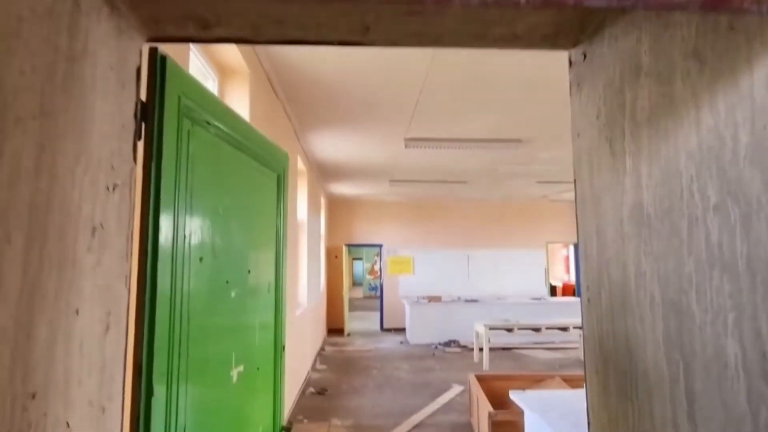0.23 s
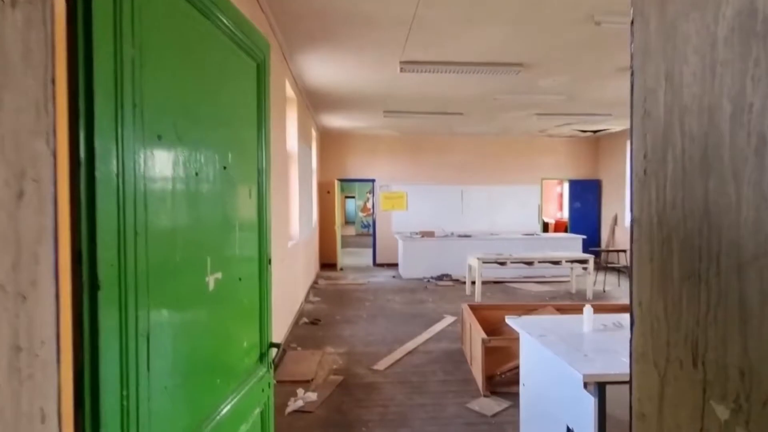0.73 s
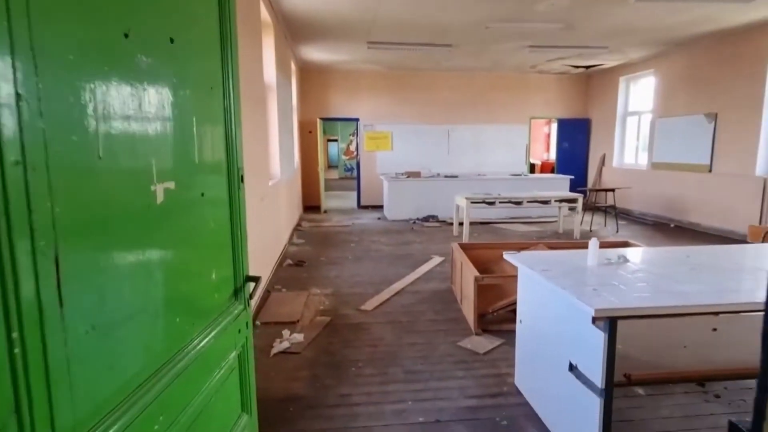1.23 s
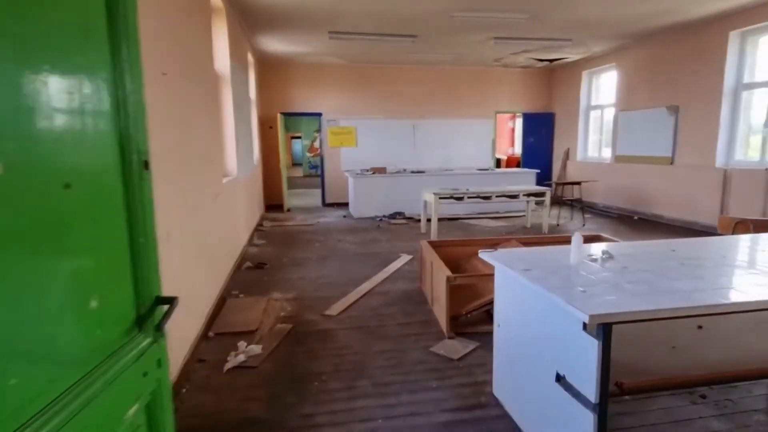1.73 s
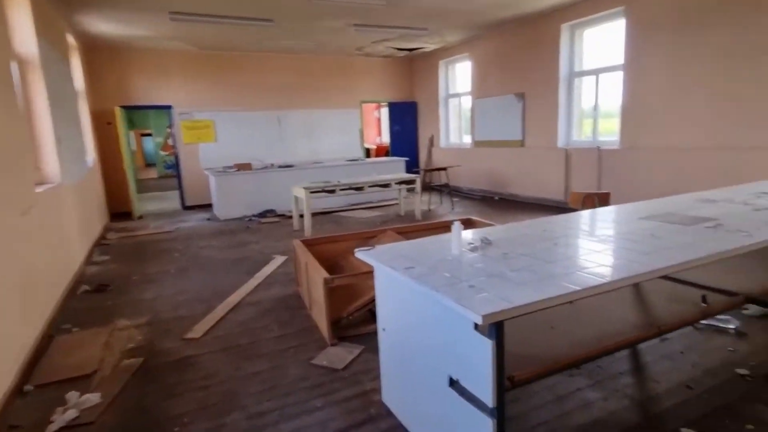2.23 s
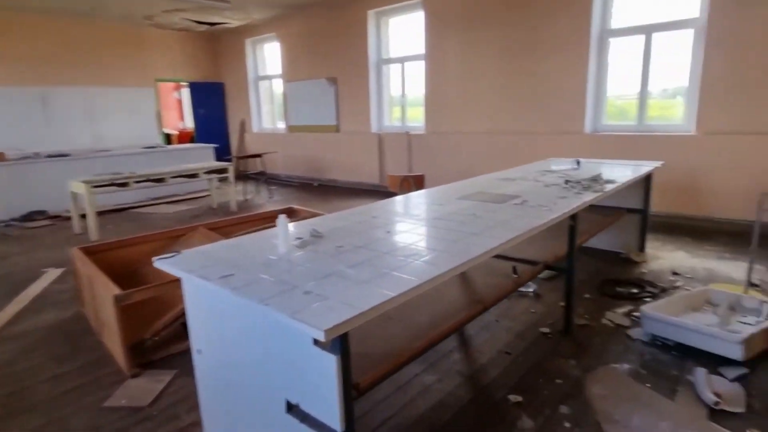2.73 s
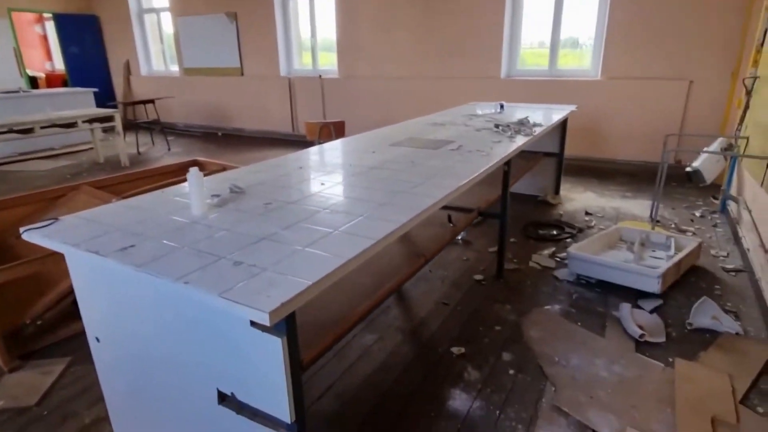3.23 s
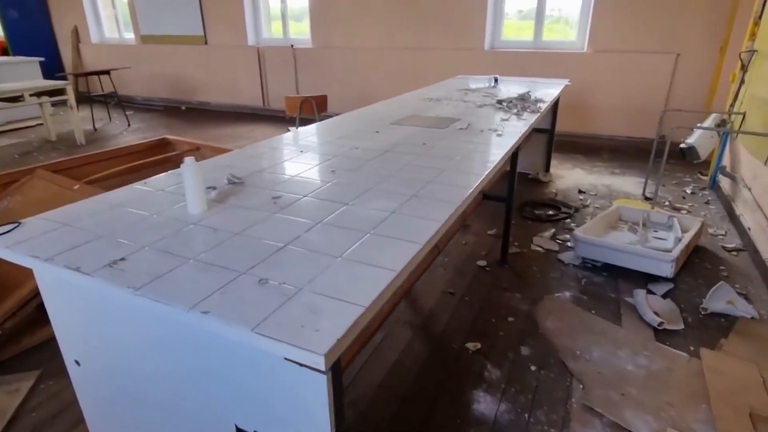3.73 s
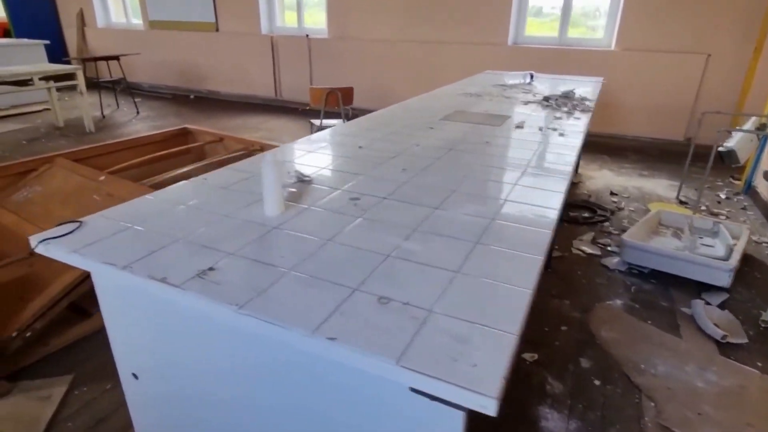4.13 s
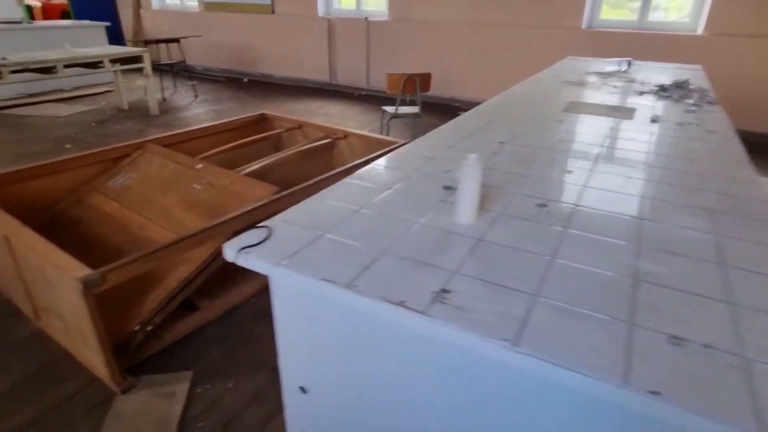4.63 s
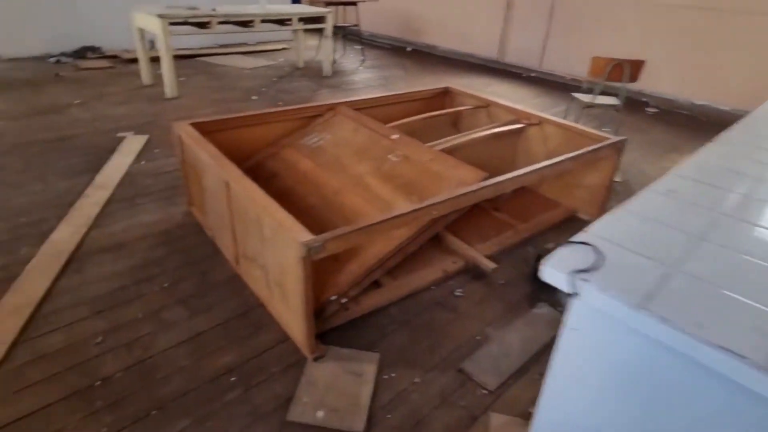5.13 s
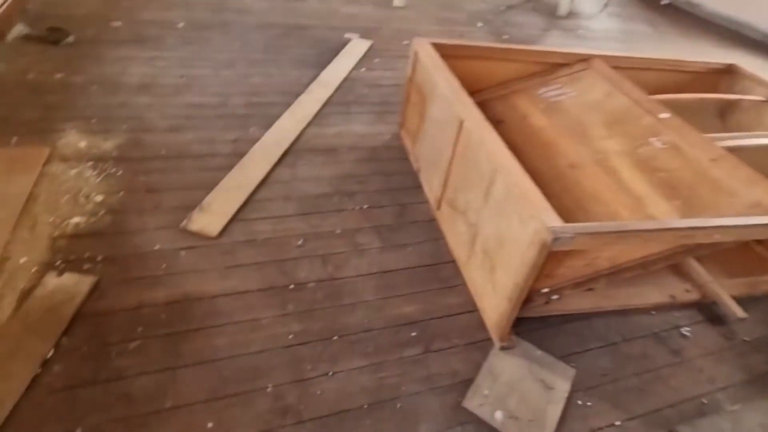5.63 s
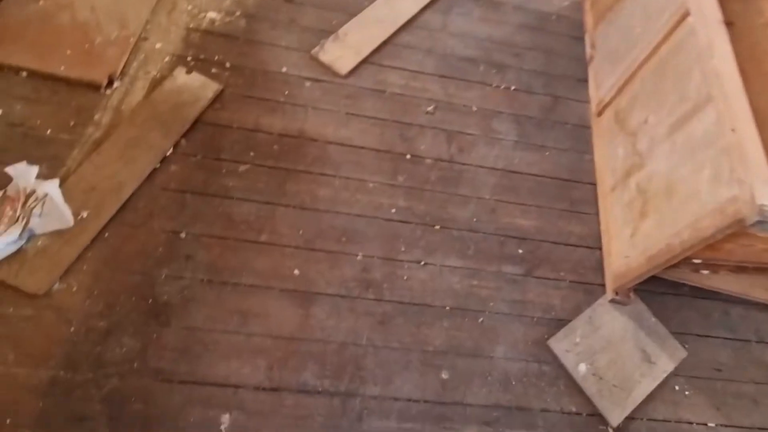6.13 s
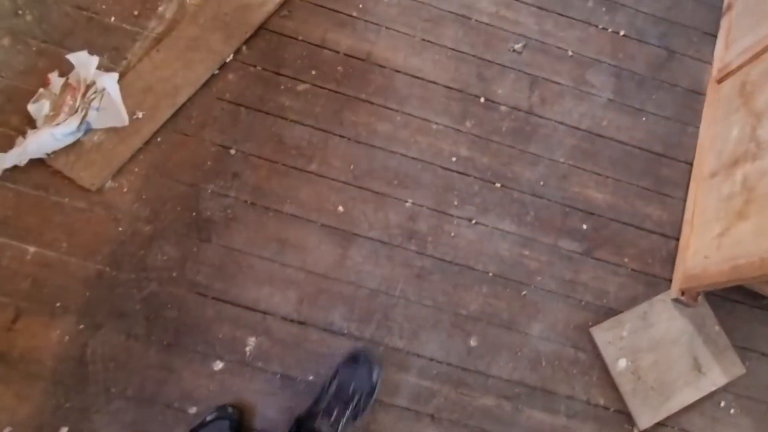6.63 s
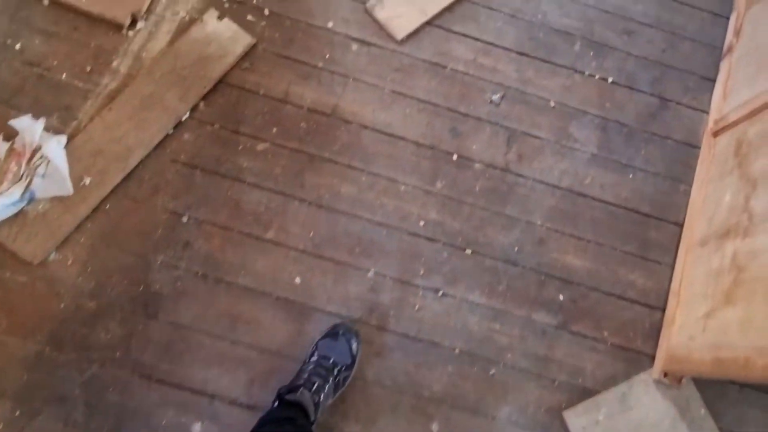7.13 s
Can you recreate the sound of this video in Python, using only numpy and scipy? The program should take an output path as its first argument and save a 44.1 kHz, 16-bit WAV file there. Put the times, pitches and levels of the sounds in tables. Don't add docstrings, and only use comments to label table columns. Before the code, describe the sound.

Someone walks over hollow wooden planks in a large empty room, with sharp heel knocks, gritty ticks and about a second of reverberation.

```python
import sys
import numpy as np
from scipy import signal
from scipy.fft import rfft, irfft, next_fast_len
from scipy.io import wavfile
from scipy.ndimage import uniform_filter1d, map_coordinates

SR = 44100
rng = np.random.default_rng(int(sys.argv[2]) if len(sys.argv) > 2 else 0)


def attenuation_scalar(level_db):
    decades = np.asarray(level_db, float) / 20
    return 10 ** decades


def bounce(signal):
    frames = np.transpose(np.atleast_2d(signal))
    limited = np.clip(frames, -1, 1)
    pcm = np.round(limited * 32767).astype(np.int16)
    wavfile.write(sys.argv[1], SR, pcm)


N = 326340

# frequency in Hz, level in dB per Hz.
HISS_SPECTRUM = [(800, -36), (2000, -1), (5000, 0), (8000, 2.5), (12000, -.5), (16000, -2)]
# frequency in Hz, level in dB per Hz.
AIR_SPECTRUM = [(35, -34), (60, 2.5), (120, 1), (250, -0.5), (400, -2.5), (770, -5.5), (1100, -13.5),
                (2300, -22.5), (4000, -28.5), (7200, -32), (10000, -29), (12000, -41.5), (16000, -72)]
# start in seconds, hold in seconds, level in dB.
SHIFTS = [
    (1.05, 0.13, -66),
    (1.85, 0.034, -61),
    (2.8, 0.027, -52.5),
    (3.3, 0.22, -57),
    (3.8, 0.077, -61),
    (5.2, .03, -63),
    (5.55, 0.02, -54),
    (6.3, 0.17, -62),
    (7.2, 0.074, -72),
]
# frequency in Hz, level in dB per Hz.
JOIST_SPECTRUM = [(15, -19), (30, -10), (50, 0.5), (65, 3.5), (110, -6), (200, -36.5)]
# start in seconds, hold in seconds, level in dB.
DRAGS = [
    (0.0, 0.17, -48.5),
    (1.0, 0.34, -50.5),
    (1.45, 0.36, -57.5),
    (1.95, 0.1, -53),
    (2.55, 0.1, -46),
    (6.26, .01, -44),
    (6.42, 0.41, -59),
]
# frequency in Hz, level in dB per Hz.
DRAG_SPECTRUM = [(88, -50), (150, 1.5), (245, -0.5), (361, -9), (475, 2.5), (800, -11.5), (1360, -13),
                 (2200, -36.5), (6600, -120)]
# start in seconds, peak in dB, t60 in seconds, treble loss in dB per octave.
SOFT_STEPS = [(.019, -47.5, 0.18, 9), (.378, -42.5, 0.39, 10.5), (.875, -40.5, 0.31, 11.5),
              (1.05, -47, 0.24, 11.5), (1.199, -42, 0.25, 8.5), (1.328, -40.5, 0.099, 20),
              (1.421, -62, .057, 17), (1.768, -43.5, 0.16, 10), (1.854, -42, 0.27, 31),
              (1.922, -39, 0.065, 14), (2.054, -40.5, 0.045, 9.5), (2.504, -44, 0.16, 16.5),
              (2.556, -42, 0.46, 32), (6.337, -55, 0.056, 8), (6.388, -45, 0.039, 14),
              (6.79, -45.5, .15, 38)]
# start in seconds, peak in dB, room send
# in dB, treble loss in dB per octave.
GRIT = [(0.899, -44.5, 1, 23), (0.9454, -42, 3, 37), (1.1897, -42.5, 0, 32), (1.2962, -50.5, 10, 25),
        (1.77, -46.5, -2, 11), (1.921, -50, -6, 29), (1.9707, -45.5, 9, 37), (2.801, -44.5, 2.5, 24),
        (2.8692, -33.5, 0, 26), (3.1074, -53, -22, 55), (3.232, -37, -11.5, 28), (3.3211, -52, -21, 38),
        (3.6207, -40, -28, 52), (3.647, -40, -7, 66), (3.8372, -49, 2, 21), (4.087, -48.5, 5.5, 39),
        (4.524, -18.5, -33, 21.5), (4.8387, -39, -13, 31), (5.4976, -60, -11, 21),
        (5.5225, -31.5, -8.5, 27), (5.8714, -65, -16, 7), (6.1845, -55, -4, 9), (6.307, -44, -2.5, 34)]
# start in seconds, peak in dB, t60 in seconds, room send in dB,
# treble loss in dB per octave.
CRACKS = [(2.733, -30, 0.043, 9.5, 43), (2.748, -25.5, 0.045, -3.5, 19.5), (2.871, -23.5, 0.077, 1.5, 24.5),
          (3.069, -29.5, 0.034, -3, 17), (3.1, -31, .05, -2, 37), (3.372, -27.5, 0.04, 6, 57),
          (3.7, -5.5, 0.015, -2.5, 26), (3.837, -20.5, 0.037, -1, 22), (4.444, -34.5, .036, 3.5, 18),
          (4.524, -4, 0.011, 0.5, 19), (5.178, -7, 0.024, -2.5, 31.5), (6.16, -45, 0.016, 10.5, 68),
          (6.236, -24.5, 0.023, -2, 58.5), (6.247, -33.5, 0.037, -12, 22), (6.559, -36, 0.016, -3, 35),
          (7.22, -33.5, 0.076, -4, 66)]
# start in seconds, peak in dB, pitch in Hz, rise in seconds,
# room send in dB.
SWELLS = [(.39, -62.5, 2220, .003, 22.5), (0.398, -55, 3270, .002, 13.5), (1.35, -55, 1390, 0.057, 3.5),
          (1.4, -49, 705, 0.0091, -2), (1.48, -60, 767, 0.12, 0), (2.729, -11, 107, 0.032, -5.5),
          (2.733, -21.5, 241, 0.024, 2), (2.742, -28.5, 533, 0.007, 4), (2.777, -23.5, 108, 0.055, -18),
          (2.849, -26, 110, 0.034, 1), (2.951, -34, 99, 0.052, -9), (3.1, -35, 1064, 0.0046, -13),
          (4.448, -23, 158.4, 0.04, 0), (6.76, -63, 1330, 0.086, 4), (6.8, -47, 475, 0.027, 3)]
# start in seconds, peak in dB, pitch in Hz, room send in dB.
THUMPS = [(2.06, -41, 250, -25), (3.072, -32.5, 580, 1), (3.14, -35, 207, 7), (3.72, -34.5, 147.6, 4),
          (3.84, -26, 133.3, -3.5), (3.85, -22.5, 183.8, 1.5), (4.402, -34.5, 167, 9),
          (4.5245, -5.5, 683, -6.5), (4.526, -17, 2500, -23), (4.53, -18, 534, 4), (4.534, -16, 213, -4),
          (4.536, -30, 870, -27), (5.174, -14.5, 256.3, -1), (5.176, -25, 1070, -13), (5.18, -22.5, 684, 5),
          (5.201, -29.5, 152, -4.5), (5.575, -26, 266, -36)]
# start in seconds, peak in dB, pitch in Hz, room send in dB.
TAPS = [(1.139, -40, 152, -19), (2.297, -44, 273, -6), (3.415, -25, 231, -10), (3.45, -28, 195, 4),
        (5.581, -31, 66, -12), (6.156, -39, 493, -11), (6.183, -37.5, 154, 8.5), (6.236, -29, 824, -30),
        (6.368, -32.5, 184, 1), (6.39, -45, 346, -8), (6.556, -38.5, 510, -18), (6.736, -49, 180, 9),
        (7.2, -39.5, 185, -2), (7.285, -45, 234, -9), (.89, -48.5, 310, 12), (1.05, -39, 174, -2),
        (1.32, -39, 250, 4.5), (1.848, -44.5, 223, -16)]
# start in seconds, peak in dB, pitch in Hz, t60 in seconds, room send in dB.
KNOCKS = [(3.071, -20.5, 353, 0.05, -2), (3.071, -34.5, 926, 0.12, 1), (3.701, -6.5, 348, 0.038, -14),
          (3.709, -11.5, 351, 0.36, -8.5), (3.7, -26, 755, 0.071, 5.5), (3.839, -13, 285, 0.12, -2.5),
          (4.443, -27, 322.5, 0.072, -6), (4.526, -2.5, 323, 0.02, -7.5), (5.175, -14, 497, 0.019, -8),
          (5.47, -29.5, 222, 0.067, 6.5), (7.215, -49, 390, 0.087, 13), (3.371, -23.5, 223, 0.075, -3),
          (3.373, -38, 620, 0.046, -3), (6.234, -23, 267, 0.05, -8), (6.247, -42.5, 2350, 0.02, -6)]
# delay in seconds, level in dB.
EARLY_ECHOES = [(.013, -7), (.017, -19.5), (.022, -17.5), (.035, -31)]
# frequency in Hz, t60 in seconds.
HALL_DECAY = [(60, 0.93), (150, 0.79), (500, 1.0), (2000, 0.95), (5000, 0.76), (9000, 1), (14000, 0.62)]
# frequency in Hz, side level over mid in dB.
WIDTH = [(300, -38), (1000, -28.5), (2500, -17.5), (4500, -18), (8000, -7.5), (11000, 3.5), (13000, -7)]
# frequency in Hz, gain in dB.
BAND_LIMIT = [(15700, 0), (15850, -120)]


def unit(x):
    return x / np.sqrt(np.mean(x ** 2) + 1e-20)


def along(points, hz):
    f, values = np.transpose(points)
    return np.interp(np.log(hz + 1), np.log(f + 1), values)


def coloured(x, spectrum):
    size = next_fast_len(N + 8192)
    gain = attenuation_scalar(along(spectrum, np.fft.rfftfreq(size, 1 / SR)))
    return irfft(rfft(x, size) * gain, size)[..., :N]


def rush(spectrum, patchy_db):
    z = signal.stft(rng.standard_normal(N), nperseg=512)[2]
    patches = uniform_filter1d(rng.standard_normal(z.shape), 5, 0)
    patches = uniform_filter1d(patches, 10, 1)
    noise = signal.istft(z * attenuation_scalar(patchy_db * unit(patches)), nperseg=512)[1][:N]
    return unit(coloured(noise, spectrum))


def pressure(rows, rise_db, fall_db):
    t = np.arange(N) / SR
    gain = np.zeros(N)
    for s, held, db in rows:
        before = np.maximum(s - t, 0)
        after = np.maximum(t - s - held, 0)
        gain += attenuation_scalar(db - rise_db * before - fall_db * after)
    return gain


def add(bus, s, sound, send):
    bus[:, round(s * SR):][:, :len(sound)] += [sound, send]


def contacts(events, low_hz, rise, edge):
    bus = np.zeros((2, N + SR))
    t = np.arange(SR // 4) / SR
    f = 1j * np.fft.rfftfreq(len(t), 1 / SR)
    for s, db, hz, t60, room_db, loss_db in events:
        shape = (f / (f + low_hz)) ** 2 * (1 + f / hz) ** (-loss_db / 6)
        envelope = attenuation_scalar(-60 * t / t60) * (1 - np.exp(-t / rise))
        burst = irfft(shape * rfft(rng.standard_normal(len(t)) * envelope), len(t))
        blow = irfft(shape, len(t))
        burst = burst / np.abs(burst).max() + edge * blow / np.abs(blow).max()
        burst = attenuation_scalar(db) * burst / np.abs(burst).max()
        send = attenuation_scalar(room_db) * blow * np.linalg.norm(burst) / np.linalg.norm(blow)
        add(bus, s, burst, send)
    return bus[:, :N]


def preamp_hiss():
    return attenuation_scalar(-73.5) * rush(HISS_SPECTRUM, patchy_db=2.5)


def room_air():
    return attenuation_scalar(-53.5) * rush(AIR_SPECTRUM, patchy_db=2.5)


def joist_heaves():
    weight = attenuation_scalar(-58) + pressure(SHIFTS, rise_db=65.5, fall_db=56)
    return weight * rush(JOIST_SPECTRUM, patchy_db=-0.4)


def sole_drags():
    return attenuation_scalar(-3) * pressure(DRAGS, rise_db=171, fall_db=45) * rush(DRAG_SPECTRUM, patchy_db=3.0)


def soft_steps():
    events = [(s, db, 1470, t60, 2.5, loss) for s, db, t60, loss in SOFT_STEPS]
    return contacts(events, low_hz=250, rise=0.005, edge=0.03)


def grit_ticks():
    events = [(s, db, 7900, 0.022, room, loss) for s, db, room, loss in GRIT]
    return contacts(events, low_hz=2800, rise=0.00076, edge=0.38)


def sole_cracks():
    events = [(s, db, 1944, *rest) for s, db, *rest in CRACKS]
    return contacts(events, low_hz=270, rise=0.0011, edge=1.425)


def plank_rings():
    knocks = [(s, db, hz, t60, 0.3 / hz, room) for s, db, hz, t60, room in KNOCKS]
    taps = [(s, db, hz, 0.04, 0.63 / hz, room) for s, db, hz, room in TAPS]
    thumps = [(s, db, hz, 18.3 / hz, 2.3 / hz, room) for s, db, hz, room in THUMPS]
    swells = [(s, db, hz, 0.017 + 1.84 * rise, rise, room) for s, db, hz, rise, room in SWELLS]
    return knocks + taps + thumps + swells


def planks():
    bus = np.zeros((2, N + SR))
    t = np.arange(SR // 3) / SR
    for s, db, hz, t60, rise, room_db in plank_rings():
        chatter, drift = (map_coordinates(knots, [t * hz * 0.445]) for knots in rng.standard_normal((2, 200)))
        shape = (1 - np.exp(-t / max(rise, 1e-4))) ** 2 * attenuation_scalar(-60 * t / t60)
        level = attenuation_scalar(db + 2.5 * chatter * np.minimum(t * hz / 3, 1))
        ring = -level * shape / shape.max() * np.sin(2 * np.pi * hz * t + 0.35 * drift)
        broad = shape * attenuation_scalar(-9 * t * hz) * np.sin(2 * np.pi * hz * t)
        send = attenuation_scalar(room_db - 1.5) * broad * np.linalg.norm(ring) / np.linalg.norm(broad)
        add(bus, s, ring, send)
    return bus[:, :N]


def early_echoes(sound):
    return sum(attenuation_scalar(db) * np.roll(sound, round(delay * SR)) for delay, db in EARLY_ECHOES)


def hall(send):
    hop = SR // 4
    wet = np.zeros(N + 3 * SR)
    fade = signal.windows.hann(2 * hop, sym=False)
    padded = np.pad(send, (hop, 2 * hop))
    for start in range(0, N + hop, hop):
        hz, t, z = signal.stft(rng.standard_normal(SR), SR, nperseg=512)
        build = 1 - np.exp(-t / 0.033)
        decay = attenuation_scalar(-60 * t / along(HALL_DECAY, hz)[:, None])
        tail = signal.istft(z * build * decay, SR, nperseg=512)[1]
        tail[:round(0.012 * SR)] = 0
        answer = signal.fftconvolve(padded[start:start + 2 * hop] * fade, tail / np.linalg.norm(tail))
        wet[start:start + len(answer)] += answer
    return wet[hop:hop + N]


def scene():
    background = room_air() + sole_drags() + joist_heaves()
    soft, soft_send = soft_steps()
    tick, tick_send = grit_ticks()
    crack, crack_send = sole_cracks()
    ring, ring_send = planks()
    wet = hall(ring_send + crack_send + attenuation_scalar(-2) * tick_send + soft_send)
    mid = background + wet + ring + crack + tick + soft + early_echoes(crack + soft)
    spread = np.roll(crack + tick + ring, 3) + attenuation_scalar(0.8) * np.roll(wet, 90)
    side = coloured(spread, WIDTH) + preamp_hiss()
    return mid + np.array([side, -side])


def top_cut(x):
    return signal.sosfilt(signal.butter(12, 16480, fs=SR, output="sos"), x)


def record(dry):
    held = dry / (1 + np.abs(dry / 0.9) ** 6) ** (1 / 6)
    mix = coloured(held, BAND_LIMIT)
    return top_cut(mix)


dry = scene()
out = record(dry)
bounce(out)
```